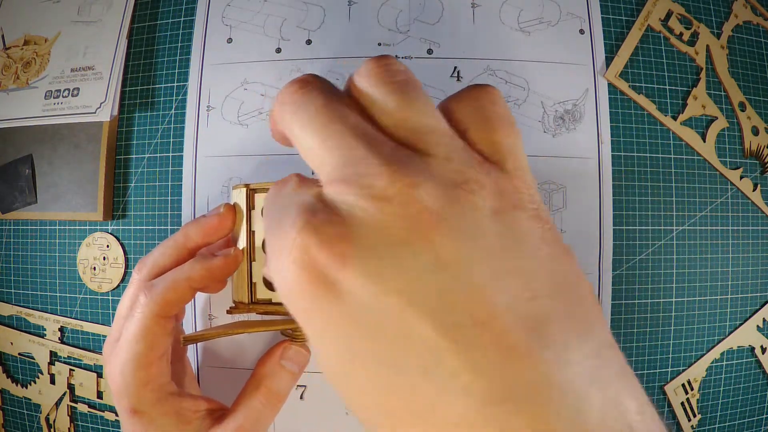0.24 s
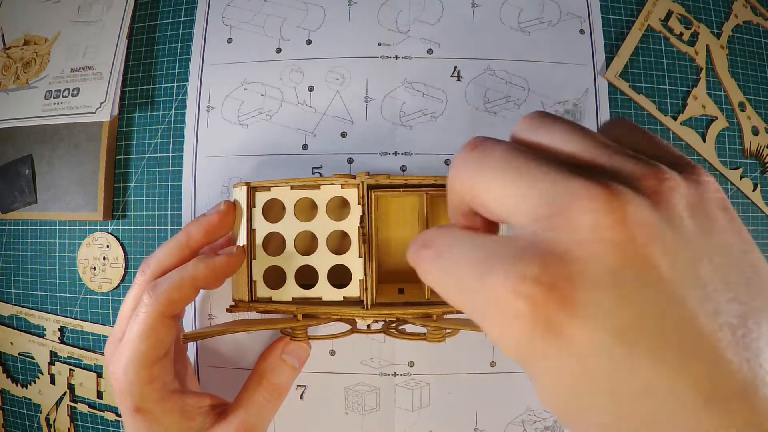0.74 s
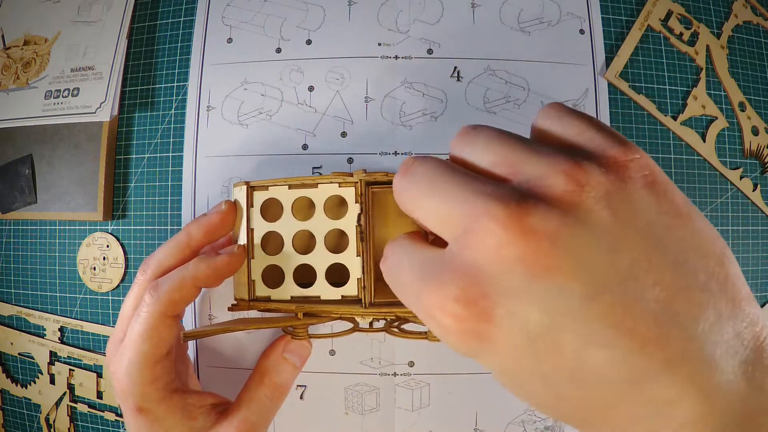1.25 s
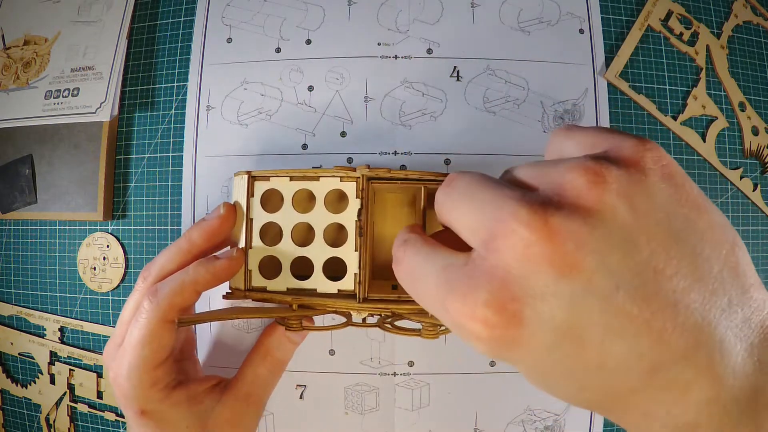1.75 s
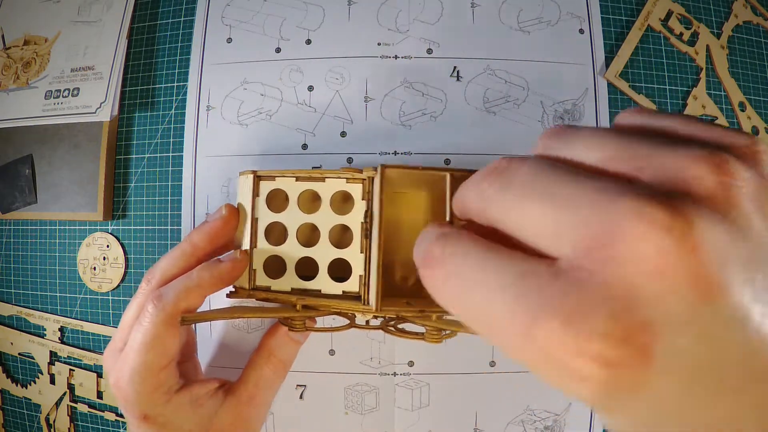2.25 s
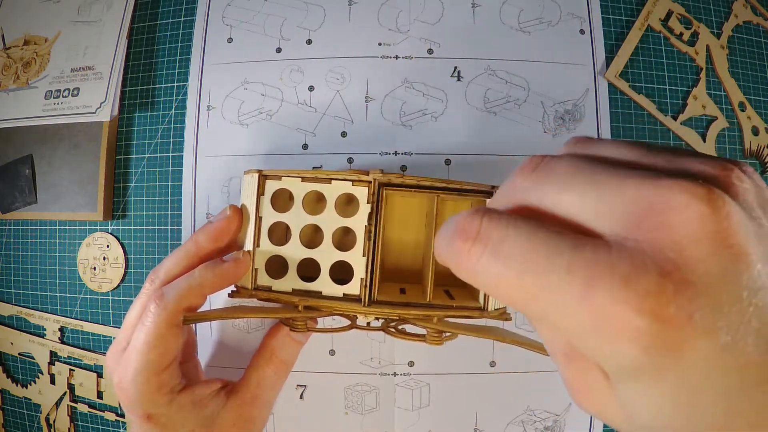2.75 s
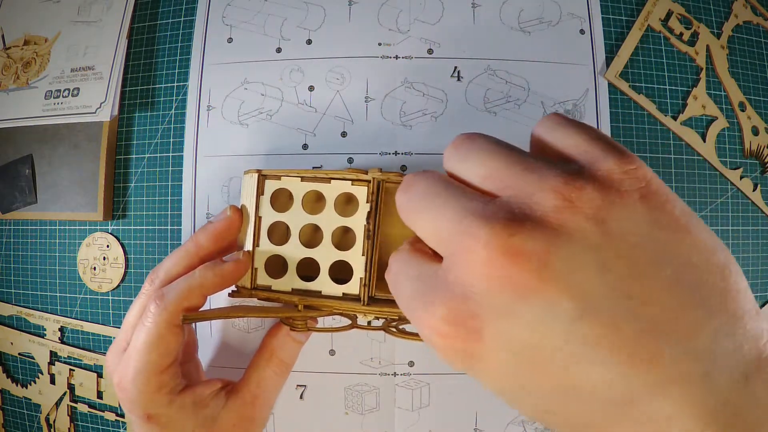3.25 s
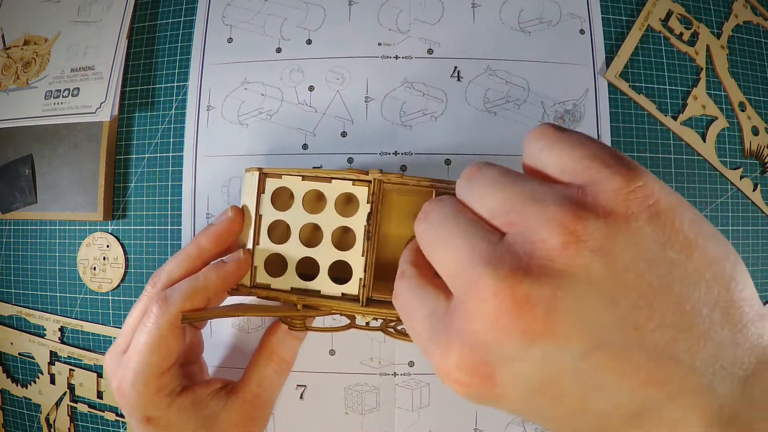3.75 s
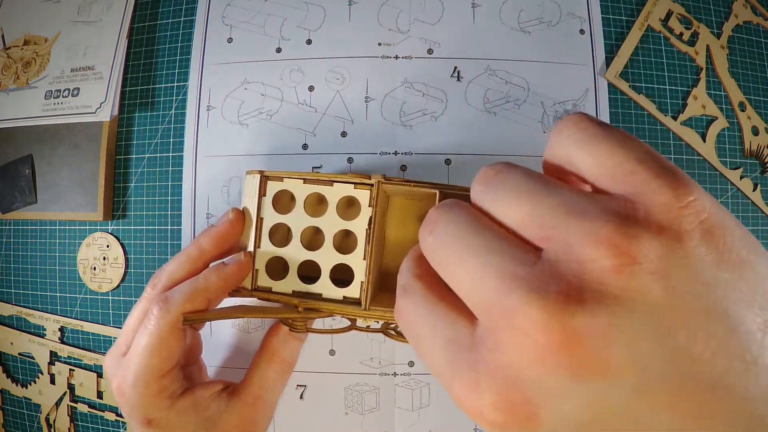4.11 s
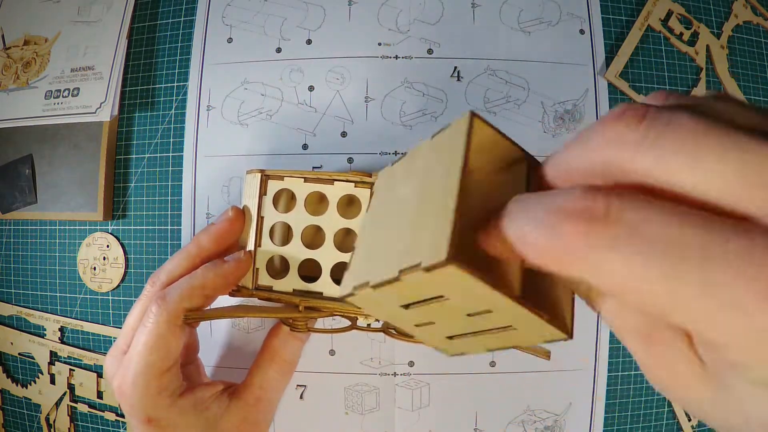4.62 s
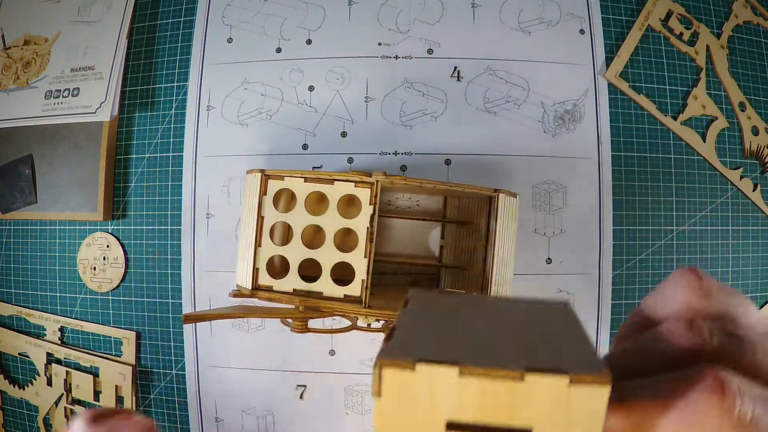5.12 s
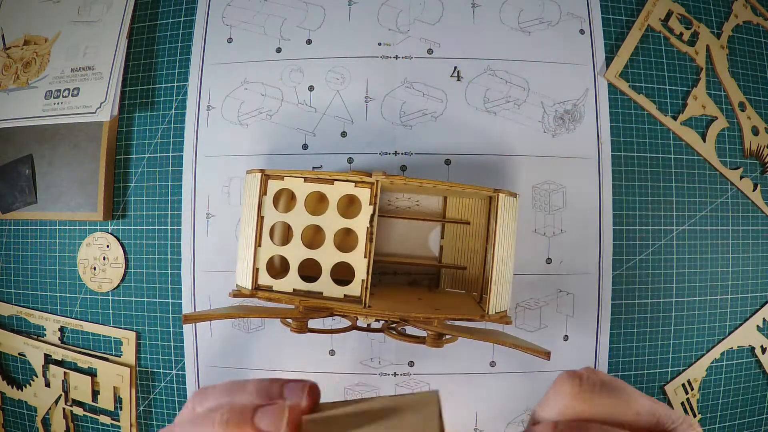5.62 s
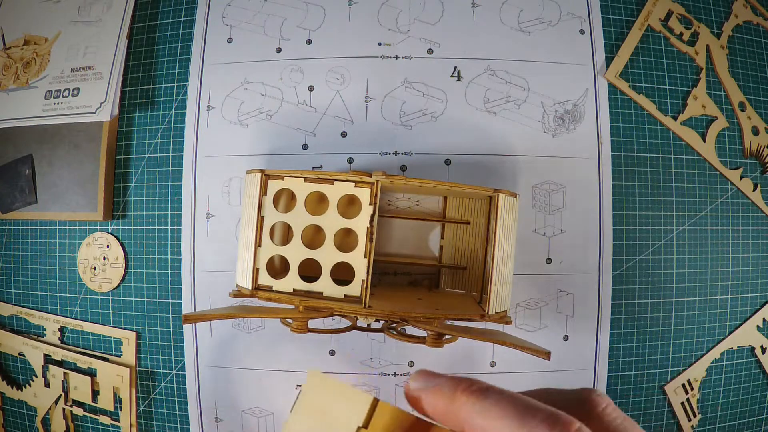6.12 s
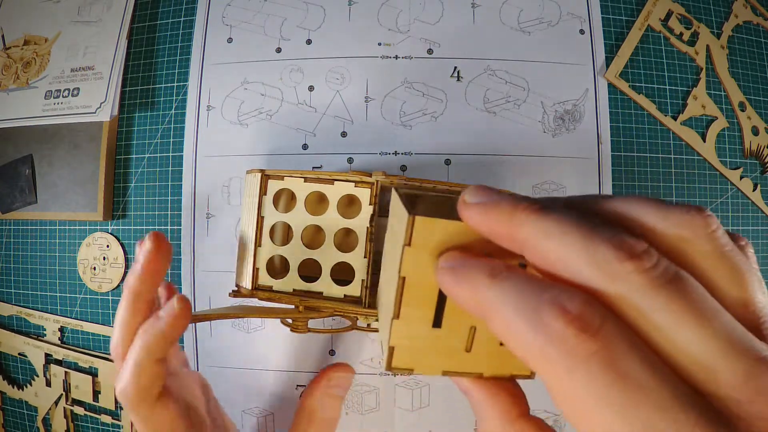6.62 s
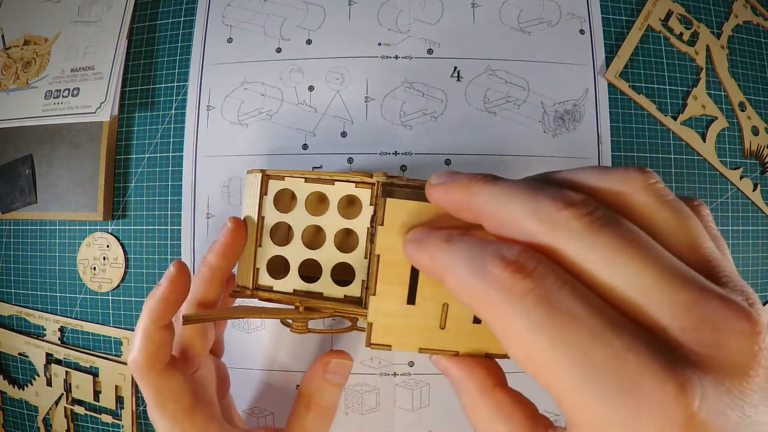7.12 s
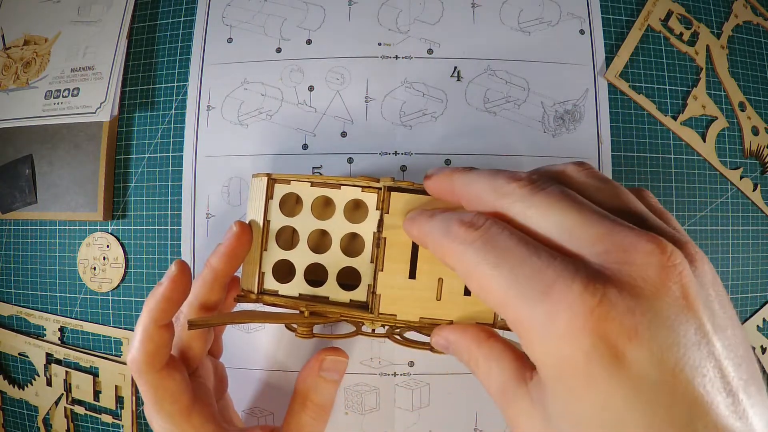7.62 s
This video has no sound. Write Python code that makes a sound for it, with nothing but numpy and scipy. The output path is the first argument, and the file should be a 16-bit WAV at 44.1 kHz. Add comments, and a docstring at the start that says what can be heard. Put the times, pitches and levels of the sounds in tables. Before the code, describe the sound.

Close stereo pickup in a small, quiet room with faint mains hum and soft hiss. Fingers barely rub thin wood, then a little plywood drawer knocks and grinds in its frame. A sharp cluster of clacks is the loudest moment, followed by sparse taps, a rougher scraping pull outward, faint handling, and finally softer knocks and short slides as the drawer is fitted again.

```python
"""Mains hum and faint hiss lie under soft rubs on wood, then a plywood drawer knocks and grinds close by.
The small drawer is slid, seated and lifted out of a wooden model on a desk, close to the microphone.
Rough laser-cut edges grind and knock: random forces play the resonances of walls, edges, frame and desk top.
Short rubs and squeaks and a faint creeping grip use finer friction. A small dry room answers from a
decaying noise tail."""
import sys
import numpy as np
from scipy import signal
from scipy.fft import rfft, irfft
from scipy.io import wavfile
from scipy.ndimage import uniform_filter1d, map_coordinates

SR = 44100
rng = np.random.default_rng(int(sys.argv[2]) if len(sys.argv) > 2 else 0)


def waveform_to_disk(signal):
    """Save audio, clipped to [-1, 1], as 16-bit WAV at the path in sys.argv[1]."""
    frames = np.transpose(np.atleast_2d(signal))
    scaled = np.clip(frames, -1, 1) * 32767
    samples = np.round(scaled).astype(np.int16)
    wavfile.write(sys.argv[1], SR, samples)


N = 346626

# time axis of an impulse response [s]
RING = np.arange(SR // 2) / SR


def undb(db):
    """Decibels to gain."""
    return 10 ** (np.asarray(db) / 20)


def unit(x):
    """Scale to rms 1."""
    return x / np.sqrt(np.mean(x ** 2) + 1e-30)


def on_log(hz, points, column=1):
    """Read a table on a log-frequency axis."""
    points = np.array(points)
    return np.interp(np.log(np.maximum(hz, 1)), np.log(points[:, 0]), points[:, column])


def convolve(x, response):
    """Play x through a response."""
    return signal.fftconvolve(x, response)[:len(x)]


def add(out, s, sound):
    """Mix a sound in at time s."""
    i = max(int(s * SR), 0)
    out[..., i:i + sound.shape[-1]] += sound[..., :max(N - i, 0)]


def walk(rate):
    """Random wander in straight lines between new values, rate of them per second; spread near 0.7."""
    k = max(int(SR / rate), 1)
    steps = np.repeat(rng.standard_normal(N // k + 1), k)
    return 0.87 * uniform_filter1d(steps, k)[:N]


def read(x, place):
    """Read x at moving positions, in samples."""
    return map_coordinates(x, [place], order=3, mode="grid-wrap")


def background(alike_hz):
    """Steady mains hum, stronger on the left; room air more alike left and right in the bass than in the treble."""
    mains_hz, air_db = 50, -65.5
    # harmonics present in the hum: multiples of the mains frequency
    hum_orders = [1, 2, 3, 5, 7, 9, 13]
    # mains hum, one row per harmonic: (left level [dB], right level [dB])
    hum_levels = [(-53, -61), (-83.5, -86), (-64.5, -72.5), (-78, -86), (-85, -92.5), (-87, -94),
                  (-95, -95)]
    # spectrum shape of still room and microphone hiss: (frequency [Hz], relative density [dB])
    air_shape = [(25, -81), (50, -100.5), (100, -100.7), (200, -104.5), (400, -110.9), (800, -112.8),
                 (1600, -116.8), (3200, -122.0), (7000, -125.3), (14000, -126.7)]
    time = np.arange(N) / SR
    hum = np.zeros((2, N))
    for order, (left, right) in zip(hum_orders, hum_levels):
        tone = np.sin(2 * np.pi * (order * mains_hz * time + rng.random()))
        hum += np.sqrt(2) * undb([[left], [right]]) * tone
    hz = np.fft.rfftfreq(N, 1 / SR)
    mid, side = rfft(rng.standard_normal((2, N))) * undb(on_log(hz, air_shape))
    side *= np.sqrt((hz + .3 * alike_hz) / (hz + alike_hz))
    mid, side = irfft(mid, N), irfft(side, N)
    air = mid + np.array([[1], [-1]]) * side
    return hum + undb(air_db) * air / np.std(mid)


def part(body, modes, ring_db):
    """Impulse response of a wooden part: a dead, causal crack plus its ringing modes."""
    n = len(RING)
    # folding the cepstrum forward makes the crack start at once (minimum phase)
    cepstrum = irfft(np.log(undb(on_log(np.fft.rfftfreq(n, 1 / SR), body))), n)
    cepstrum[1:n // 2] *= 2
    cepstrum[n // 2:] = 0
    out = irfft(np.exp(rfft(cepstrum)), n)
    for k, (hz, db, t60) in enumerate(modes):
        damping = np.log(1000) / t60
        ring = np.exp(-damping * RING) * np.sin(2 * np.pi * hz * RING)
        # neighbouring plate modes move in opposite senses at the struck point
        out += (-1) ** k * undb(db + ring_db) * 2 * damping / SR * ring
    return out


def wooden_parts():
    """Desk top, frame, drawer walls and cut edges, each a broad damped body with sharper modes on top."""
    # ringing modes of each part: (frequency [Hz], level before the part's ring gain [dB], t60 [s])
    desk_modes = [(100, 0, 0.3), (117.4, 3, 0.24), (165.6, -1, 0.27), (185, -1.5, 0.18), (200, -1, .08),
                  (280.6, 4, 0.17), (322.5, 0.5, 0.056), (346.8, -0.5, .12)]
    frame_modes = [(511.5, -4.5, 0.046), (619, -11, .03), (927, -4, 0.057), (966, -2, 0.095),
                   (1033, -2.5, 0.05), (1140, -0.5, .09)]
    wall_modes = [(1370, -4, 0.12), (1375, 0, 0.038), (1400, 1, 0.054), (1475, 1.5, 0.056), (1540, -3, 0.1),
                  (1690, 0.5, 0.046), (1780, -11, 0.047), (1895, -2.5, .06), (1936, 2.5, 0.019),
                  (2170, -4.5, .05), (2482, -17.5, 0.047), (2900, -8, 0.023)]
    edge_modes = [(3408, -0.5, 0.054), (3886, -1, .02), (4217, 13, 0.013), (4670, -3, 0.038),
                  (6640, 5.5, 0.018), (6440, -10.5, 0.025), (8800, 7, 0.024), (8670, -1.5, 0.016),
                  (9170, -0.5, 0.024), (11800, -7, .015), (13700, -5.5, 0.0025)]
    # broad, quickly damped response of each part: (frequency [Hz], relative level [dB])
    desk_body = [(25, -43), (70, 5), (170, 3), (350, 0), (450, -8), (900, -48.5), (2000, -77.5)]
    frame_body = [(150, -40.5), (400, -10.5), (620, -11), (1050, 6), (1300, 5), (2600, -45.5)]
    wall_body = [(400, -52), (950, -4), (1350, 7.5), (2000, -1), (2350, -6.5), (2750, -16), (4200, -34.5),
                 (9000, -75)]
    edge_body = [(900, -70.5), (2600, 0), (3600, 6), (5400, 0.5), (8500, 3), (10500, 2), (12200, -5),
                 (15500, -15.5)]
    desk = part(desk_body, desk_modes, ring_db=7.0)
    frame = part(frame_body, frame_modes, ring_db=8.0)
    wall = part(wall_body, wall_modes, ring_db=2)
    edge = part(edge_body, edge_modes, ring_db=0.5)
    return desk, frame, wall, edge


def mode(hz, width_hz):
    """One damped ring."""
    return np.exp(-np.pi * width_hz * RING) * np.sin(2 * np.pi * hz * RING)


def favour(response, hz, width_hz, db):
    """The point of contact drives one mode more, in step with the rest; db is its energy re the rest."""
    ring = unit(mode(hz, width_hz))
    in_step = np.copysign(1, response @ ring)
    return unit(response) + undb(db) * in_step * ring


def soften(x, hz):
    """A softer, longer push drives less and less above hz."""
    return signal.sosfilt(signal.butter(2, min(hz, SR / 4), fs=SR, output="sos"), x)


def grit(rate, spread_db, smooth):
    """Friction: fibres catch and let go at random, most faintly, a few hard, over fine rubbing noise."""
    caught = rng.random(N) < rate / SR
    direction = rng.choice([-1, 1], N)
    strength = undb(spread_db * np.minimum(rng.exponential(size=N), 4))
    slips = caught * direction * strength
    return unit(unit(slips) + smooth * rng.standard_normal(N))


def grips(wall, edge, edge_db, unrest_db):
    """Faint, irregular creeping of skin on wood while a part is held."""
    # spells in which the holding fingers keep shifting:
    # (start [s], end [s], level before the fades [dB], favoured wall mode [Hz])
    grip_table = [(0, 0.296, -81.5, 1830), (4.52, 4.963, -74, 1410), (5.214, 5.33, -77, 1400),
                  (5.635, 5.811, -75, 1400)]
    force = grit(rate=1400, spread_db=4.0, smooth=0.41) * unit(undb(unrest_db * walk(30)))
    out = np.zeros(N)
    for first, last, db, hz in grip_table:
        touched = unit(favour(wall, hz, width_hz=87, db=-2)) + undb(edge_db) * unit(edge)
        creep = unit(convolve(force[max(int(first * SR), 0):int(last * SR)], touched))
        add(out, first, creep * signal.windows.tukey(len(creep)) * undb(db))
    return out


def rubs(wall, edge, trim_db, swell):
    """Short rubs and squeaks on wood, by fingertip or drawer edge: fine friction that swells and stops."""
    # each rub favours one wall mode and one edge mode; levels are before trim:
    # (time [s], length [s], favoured wall mode [Hz], favoured edge mode [Hz],
    #  wall level [dB], edge hiss re wall [dB])
    rub_table = [(.224, 0.026, 1820, 5470, -62, -2.5), (0.386, 0.014, 1190, 6260, -76, -13),
                 (0.992, 0.029, 1980, 4160, -70, 1), (1.008, 0.18, 1920, 4080, -72, -3),
                 (1.179, 0.058, 1550, 4120, -68, -6), (1.237, 0.037, 1417, 4120, -53.5, -5),
                 (2.57, 0.018, 1387, 2900, -51, -1.5), (3.165, 0.046, 1930, 4300, -65.5, -3.5),
                 (3.235, 0.029, 1780, 4570, -61, -3), (3.255, 0.023, 1830, 7560, -55.5, 0.5),
                 (3.264, 0.1, 1560, 8100, -72.5, 6), (3.571, 0.045, 1860, 4070, -67.5, 3),
                 (3.73, 0.062, 1450, 4300, -67, -9), (4.447, 0.016, 1420, 8150, -57.5, 10),
                 (4.662, 0.081, 1420, 4150, -67.5, -2.5), (4.838, 0.037, 1480, 3550, -70.5, 2.5),
                 (5.365, 0.049, 1460, 3800, -74, -0.5), (5.437, 0.076, 2050, 3930, -72.5, 6.5),
                 (5.609, 0.043, 1360, 4910, -84, 11.5), (5.697, 0.023, 1466, 8500, -54.5, -10),
                 (6.082, 0.025, 3020, 7900, -72, 7), (6.176, 0.061, 2020, 7600, -72, 4.5),
                 (6.77, 0.022, 2050, 8080, -82.5, 10), (7.548, .051, 1620, 3560, -72, -6)]
    out = np.zeros(N)
    friction = grit(rate=2800, spread_db=6.0, smooth=0.7)
    for s, length, wall_hz, edge_hz, strength_db, edge_db in rub_table:
        levels = strength_db, strength_db + edge_db
        shape = np.hanning(max(int(length * SR), 8)) ** swell
        drag = shape * np.roll(friction, -int(s * SR))[:len(shape)]
        force = np.pad(drag, (0, SR // 10))  # time to ring out
        rubbed = favour(wall, wall_hz, width_hz=90, db=3), favour(edge, edge_hz, width_hz=330, db=-1.5)
        for response, db, trim in zip(rubbed, levels, trim_db):
            sound = convolve(force, response)
            rub_rms = np.sqrt(np.sum(sound ** 2) / len(shape))
            add(out, s, sound * undb(db + trim) / rub_rms)
    return out


def knocks(parts, trim_db, crunch, rise_s, soft_hz, hard_hz):
    """Each blow is one push, then a crunch while rough faces settle; hard blows reach higher desk modes."""
    # wood meets wood; levels are over the attack, before trim:
    # (time [s], contact [ms], favoured wall mode [Hz], wall level [dB],
    #  desk re wall [dB], frame re wall [dB], edge tick re wall [dB])
    knock_table = [(1.222, 4, 1340, -64, -1, 4, -4), (1.2604, 3.6, 1397, -42, -16, -0.5, -20),
                   (1.271, 8.7, 1500, -43.5, -33, 0.5, -13), (1.285, 15, 1210, -47, -4.5, -8, -15),
                   (1.657, 14, 1700, -54, -6.5, -6.5, -15), (2.25, 21, 2120, -44.5, -26, -33, 0.5),
                   (2.308, 3.1, 1320, -57.5, 12, -0.5, 2), (2.33, 11.4, 1480, -47, -2, -31, -11.5),
                   (2.425, 10, 1600, -54, 3.5, -4, -4), (2.456, 4.1, 1430, -48.5, -5, -8, -4),
                   (2.614, 5.5, 1530, -45, -32, -15, -8), (2.625, 3.6, 1920, -41.5, -8, -9.5, -5.5),
                   (2.639, 5.1, 1870, -26.5, 1, -6, -6), (2.6509, 2.1, 2765, -31.5, -7, -12, -8.5),
                   (3.27, 4, 1540, -38.5, -14, -2, -21), (3.499, 13, 1610, -58.5, -24, -10.5, -1),
                   (3.706, 9.9, 1820, -42, -37, -19.5, -4), (3.719, 3.1, 1950, -50, 2, 0, 3),
                   (3.797, 1.3, 1540, -65, -10, -6, 3), (3.8848, 2.1, 1500, -50.5, -5.5, -5, -13),
                   (4.076, 24, 1460, -55.5, -16, -26, -2), (4.3645, 1.5, 1550, -46.5, -10, -29, -6),
                   (4.3949, 5.5, 1000, -54, -10, 9.5, 8), (4.438, 8.5, 1980, -48, -21, -29, -24),
                   (4.598, 3.8, 1250, -56.5, 2.5, -14, -0.5), (4.618, 18, 1450, -59.5, -5, -25, 2),
                   (5.346, 3.5, 1310, -79, -8, -11.5, 8), (5.6123, 3.5, 1410, -56.5, -25, -31, -9.5),
                   (5.9761, 4.4, 2540, -75.5, -13.5, -13, 9), (6.6752, 1.9, 1220, -48.5, -7, -3, -11.5),
                   (6.7949, 4.3, 1370, -52, -22, -13, 0), (6.803, 3.5, 1330, -50.5, -16, -13, 1.5),
                   (6.9613, 3.6, 1230, -54, -2, -4, -20.5), (7.011, 7.3, 1260, -58.5, 3.5, -5, -3),
                   (7.0335, 8.5, 1230, -53.5, -0.5, -2, -9.5), (7.1014, 21, 1400, -59, -3, -14, -7),
                   (7.2255, 5.7, 1600, -49.5, -3, -9, -14.5), (7.338, 7, 1540, -49.5, -6, -20, -12.5),
                   (7.3753, 12, 1490, -52.5, -21, -29, -18)]
    out = np.zeros(N)
    attack = int(.012 * SR)
    t = RING[:SR // 16]
    push = t == 0
    desk, frame, wall, edge = parts
    for s, contact_ms, hz, strength_db, desk_db, frame_db, edge_db in knock_table:
        levels = strength_db + np.array([desk_db, frame_db, 0, edge_db])
        pressure = (1 - np.exp(-t / rise_s)) * np.exp(-(t * 1000 / contact_ms) ** 2)
        force = rng.laplace(size=len(t)) * pressure
        force /= np.sqrt(np.sum(force ** 2))
        reach_hz = np.interp(levels[0], [-55, -25], [soft_hz, hard_hz])  # follows the desk level
        struck = soften(desk, reach_hz), frame, favour(wall, hz, width_hz=150, db=1), edge
        for response, db, trim, share in zip(struck, levels, trim_db, crunch):
            sound = convolve(response, share * force + push)
            attack_rms = np.sqrt(np.mean(sound[:attack] ** 2))
            add(out, s, sound * undb(db + trim) / attack_rms)
    return out


def roam(x, depth_db):
    """The contact travels over nodes and antinodes, so each resonance swells and fades on its own."""
    spectra = signal.stft(x, nperseg=512)[2]
    field = rng.standard_normal(spectra.shape)
    for _ in range(2):  # smooth over frequency, then time
        field = uniform_filter1d(uniform_filter1d(field, size=4, axis=0), size=9, axis=1)
    return signal.istft(spectra * unit(undb(depth_db * unit(field))))[1][:N]


def slides(parts, trim_db, sing_db, judder_db, wobble):
    """Each stroke takes hold, swells or eases evenly and dies away; the drawer grinds in uneven catches.
    One wall resonance glides up or down during each stroke, at the row's own rate, or holds at a rate of 0."""
    # strokes of the drawer along the frame, in or out; levels are before trim, attack and roaming:
    # (time [s], length [s], first level [dB], last level [dB], frame re walls [dB], edge hiss re walls [dB],
    #  starting wall pitch [Hz], glide [octaves/s], favoured edge rasp [Hz])
    stroke_table = [(1.281, 0.065, -54, -61.5, -12, -3.5, 1540, 0.29, 7600),
                    (1.416, 0.13, -69.5, -73.5, -3, 2, 1560, 0.14, 4360),
                    (1.534, 0.13, -63, -62.5, -4.5, -2.5, 1790, -0.057, 3460),
                    (1.71, 0.33, -71.5, -60, -4.5, -3.5, 1680, -0.015, 6700),
                    (1.983, 0.25, -66, -50.5, -8, -1, 1500, 0.21, 10100),
                    (2.264, 0.053, -64, -58, -3, 2.5, 1620, -0.47, 7200),
                    (2.396, 0.059, -52, -47, -1.5, -5.5, 1530, 0.42, 4200),
                    (2.498, 0.061, -47, -53, -27, -4.5, 1482, 0.22, 3400),
                    (3.854, 0.043, -68, -58.5, -9, 1, 1582, 0, 9400),
                    (3.916, 0.12, -70, -55.5, -16, -5.5, 1560, -0.2, 4300),
                    (4.042, 0.11, -53, -54.5, -23, 2, 1500, -0.057, 3830),
                    (4.165, 0.23, -57.5, -54, -2, 1.5, 1400, -1.1, 9600),
                    (4.408, 0.041, -55, -54.5, -17, -2, 1480, 0.87, 8350),
                    (4.463, 0.029, -56, -58, -25, 1, 2150, 0.22, 9550),
                    (6.812, 0.088, -78, -55, -9, -6.5, 1400, 0.317, 3430),
                    (7.119, .19, -67, -55, -2, -6.5, 1690, -.8, 4800),
                    (7.336, 0.12, -53, -62.5, -6.5, -7, 1430, 0.35, 3800),
                    (7.693, 0.093, -67.5, -69, -2, -4.5, 1590, 0.32, 3750),
                    (7.833, .03, -64, -63, -9, -9.5, 1600, 0, 3900)]
    attack_s, release_db_per_s = 0.021, 347.5
    # the frame hands the load on to the desk: desk level at a frame level of 0 dB, and dB per dB
    desk_load_db, desk_follow = -27, 0.62
    desk, frame, wall, edge = parts
    out = np.zeros(N)
    friction = grit(rate=1700, spread_db=2.5, smooth=0.78) * unit(undb(judder_db * walk(110)))
    waver = 1 + wobble * walk(20)
    for s, length, first_db, last_db, frame_db, edge_db, hz, glide, rasp_hz in stroke_table:
        t = np.arange(int((length + .1) * SR)) / SR
        # twice the length, as a rising glide reads ahead
        force, unsteady = (np.roll(v, -int(s * SR))[:2 * len(t)] for v in (friction, waver))
        effort_db = np.interp(t, [0, length], [first_db, last_db])
        effort_db -= release_db_per_s * np.maximum(t - length, 0)
        attack = np.minimum(t / attack_s, 1)
        place = np.cumsum(2 ** (glide * t) * unsteady[:len(t)])
        sing = read(convolve(force, mode(hz, width_hz=170)), place)
        sound = unit(sing) * undb(effort_db + sing_db)
        frame_level = effort_db + frame_db
        levels = desk_load_db + desk_follow * frame_level, frame_level, effort_db, effort_db + edge_db
        dragged = soften(desk, hz=322), frame, wall, favour(edge, rasp_hz, width_hz=960, db=-11.0)
        for response, db, trim in zip(dragged, levels, trim_db):
            sound += unit(convolve(force, response)[:len(t)]) * undb(db + trim)
        add(out, s, sound * attack)
    return roam(out, depth_db=2.6)


def room():
    """Direct sound, a little later at the left microphone port, plus a diffuse tail with its own decay per band."""
    # room echo: (band centre [Hz], t60 [s], echo re direct [dB])
    echo_bands = [(101, 0.47, -12), (410, 0.22, -2.5), (1500, 0.37, -10.5), (4075, .26, -5.5),
                  (11900, 0.2, -10)]
    port_lag_s, direct_delay_s = .000012, .0003
    hz = np.fft.rfftfreq(len(RING), 1 / SR)
    out = np.exp(-2j * np.pi * hz * (np.array([[port_lag_s], [0]]) + direct_delay_s))
    centres = np.log([row[0] for row in echo_bands])
    for share, (_, t60, db) in zip(np.eye(len(echo_bands)), echo_bands):
        decay = np.exp(-np.log(1000) * RING / t60) * (RING > .0015)
        tail = rng.standard_normal((2, len(RING))) * decay
        tail *= undb(db) / np.sqrt(np.sum(tail ** 2) / 2)
        # bands cross over evenly in energy
        out += rfft(tail) * np.sqrt(np.interp(np.log(hz + 1), centres, share))
    return irfft(out, len(RING))[:, :len(RING) - SR // 10]


def scene():
    """Desk, frame, drawer walls and edges sound in one room, held, rubbed, struck and slid on."""
    parts = wooden_parts()
    _, _, wall, edge = parts
    wood = grips(wall, edge, edge_db=-9, unrest_db=4)
    wood += rubs(wall, edge, trim_db=(.3, .3), swell=0.13)
    # trims and crunch shares in the order desk, frame, wall, edge
    wood += knocks(parts, trim_db=(0.1, 0.092, 0.1, 0.07), crunch=(.25, 1.1, 1.8, 4),
                   rise_s=0.0018, soft_hz=196.5, hard_hz=333.2)
    wood += slides(parts, trim_db=(-1.5, -5.5, -2.0, .3), sing_db=-1.5, judder_db=2.14, wobble=.03)
    in_room = np.array([convolve(wood, ear) for ear in room()])
    return in_room + background(alike_hz=1500)


def record(dry):
    """The recorder cuts the top steeply, above 15.9 kHz."""
    return signal.sosfilt(signal.ellip(10, .2, 70, 15900, fs=SR, output="sos"), dry)


dry = scene()
out = record(dry)
waveform_to_disk(out)
```